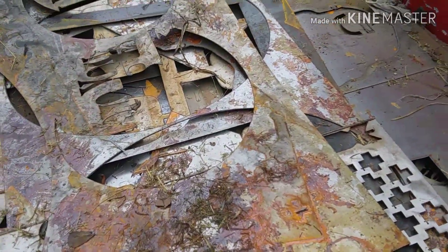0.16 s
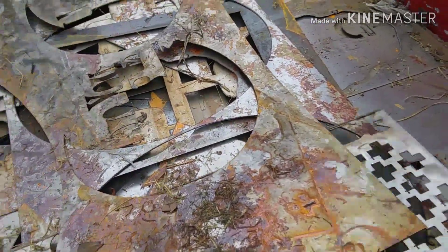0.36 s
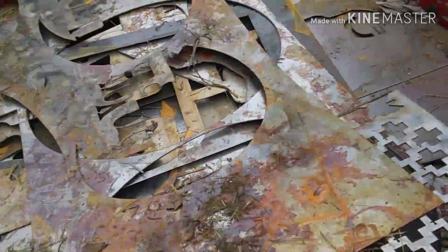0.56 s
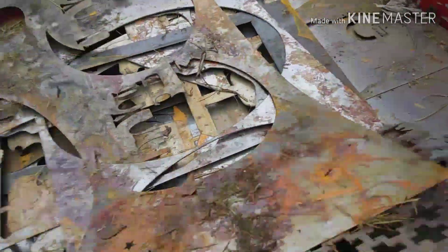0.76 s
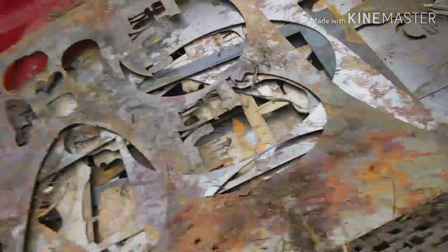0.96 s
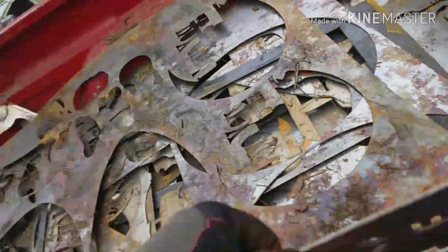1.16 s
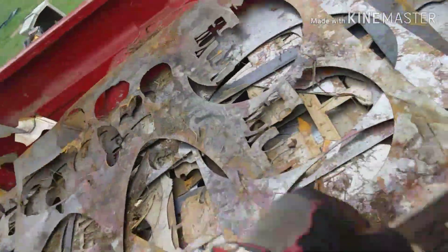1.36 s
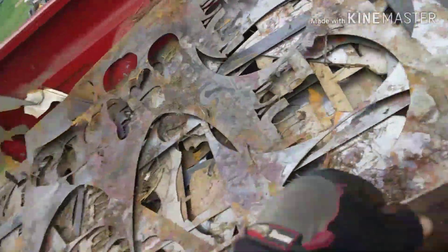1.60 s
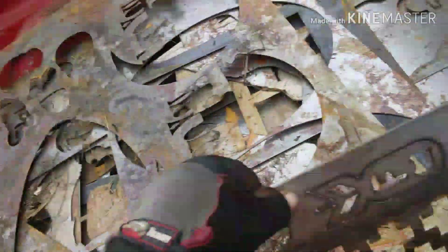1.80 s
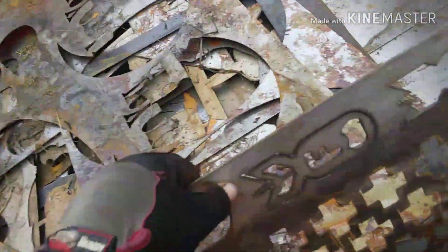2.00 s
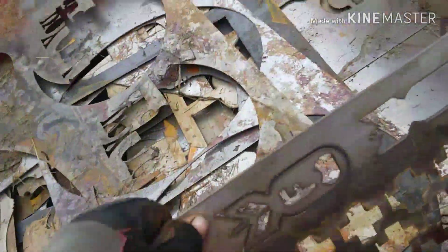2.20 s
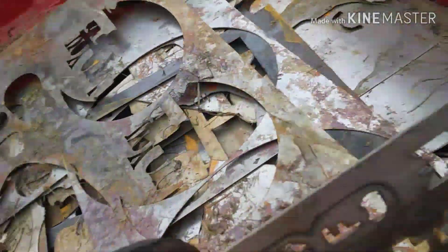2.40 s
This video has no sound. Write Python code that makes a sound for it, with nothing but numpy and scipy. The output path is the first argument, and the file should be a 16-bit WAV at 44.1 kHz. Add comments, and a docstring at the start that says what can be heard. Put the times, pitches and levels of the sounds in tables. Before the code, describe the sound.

Thin steel sheets on a truck bed: near silence, a sudden burst of clanking knocks, thuds and brief yelps, then a long gritty scrape that brightens and fades to a few light ticks; outdoors, close, overloaded microphone.

```python
"""On a truck bed outdoors, thin rusty steel sheets are dragged off a pile, close to one microphone.
Grit under the sliding sheet and knocks of cut edges are random clicks and noise bursts that ring
the dense modes of the sheets. The bed thuds as decaying tones and rumbles as long ringing noise,
a bending sheet yelps in short broken gliding rings, a skating edge hisses as a band of noise,
and a faint outdoor rumble lies below. The loud middle overloads the recorder."""
import sys
import numpy as np
from scipy import signal
from scipy.fft import rfft, irfft
from scipy.io import wavfile
from scipy.ndimage import uniform_filter1d

SR = 44100
rng = np.random.default_rng(int(sys.argv[2]) if len(sys.argv) > 2 else 0)


def gain_from_decibels(decibels):
    """Convert decibel values to linear amplitude factors."""
    exponent = np.asarray(decibels, float) / 20
    return 10 ** exponent


def output_pcm(signal):
    """Save a mono or channel-first signal as 16-bit PCM at the path in sys.argv[1].

    Samples are clipped to [-1, 1] before scaling.
    """
    pcm = np.clip(np.atleast_2d(signal).T, -1, 1) * 32767
    wavfile.write(sys.argv[1], SR, np.round(pcm).astype(np.int16))


N = 108045  # length of the scene in samples

# All levels in the tables are those before record().
# How hard grit drives the body of the sheets during the drag: time_s, level_db
DRAG = [(0.03, -72), (0.06, -42.5), (0.09, -44), (0.18, -54), (0.2, -46), (0.26, -14), (0.34, -22),
        (0.35, -17), (0.5, -26.5), (0.55, -23.5), (0.57, -21.5), (0.6, -17.5), (0.74, -15), (0.97, -18),
        (1.31, -15), (1.7, -15.5), (1.92, -21), (1.94, -21), (2.18, -37), (2.19, -39), (2.27, -44.5),
        (2.33, -40.5), (2.34, -34.5), (2.45, -45.5)]
# How hard the rasp of edge on edge drives the treble: time_s, level_db
RASP = [(.24, -46), (.42, -45), (.47, -55), (.61, -37.5), (0.73, -35), (0.836, -34), (0.956, -29),
        (0.968, -24.5), (1.016, -26.5), (1.032, -24.5), (1.084, -31), (1.112, -25.5), (1.12, -26),
        (1.258, -31), (1.294, -23), (1.358, -32.5), (1.37, -23), (1.47, -26.5), (1.478, -24.5),
        (1.554, -30.5), (1.908, -44), (1.92, -40.5), (2.012, -58), (2.036, -51), (2.16, -71)]
# Edges knocking: start_s, treble_level_db, body_level_db (before KNOCK_BODY_DB), decay_to_1/e_s
KNOCKS = [(0.028, -82, -47, 0.021), (0.052, -69, -35.5, .025), (0.092, -52.5, -34, 0.0043),
          (0.193, -62, -21, 0.016), (0.231, -56, -12, .016), (0.254, -36.5, -14.5, 0.019),
          (.339, -40, -8, 0.017), (.406, -32, -7.5, .011), (0.474, -33, -11, 0.0069),
          (0.517, -30, -7.5, 0.0079), (0.564, -28, -4, 0.011), (.593, -22, -9, .014),
          (.683, -19, -14.5, 0.015), (1.363, -20, -25, .008), (2.177, -48, -21.5, 0.013),
          (2.306, -62, -30, 0.016), (2.334, -50, -26, 0.0069), (2.347, -36, -24, 0.0052)]
KNOCK_BODY_DB = -9  # added to the body level of every knock
# Tone colour of the sheets' body, only relative: frequency_hz, level_db_per_hz
BODY_COLOUR = [(29, -95), (50, -60), (101, -27), (151, -41), (201, -19), (299, -14), (444, -12), (794, -3),
               (1340, 0.5), (1940, 0.5), (2800, -4.5), (3780, -9), (5000, -13), (6000, -20), (7000, -33),
               (9360, -47.5), (15800, -100)]
# Tone colour of the sheets' edges, only relative: frequency_hz, level_db_per_hz
EDGE_COLOUR = [(1470, -44.5), (2500, 5.5), (2890, -5.5), (4540, -1.5), (5210, -2), (7470, -14),
               (8780, -9.5), (10200, -10), (12700, -16.5), (15600, -19.5)]
# How long the sheets ring: frequency_hz, time_to_fall_60_db_s
RING = [(200, 0.65), (1000, 0.28), (3000, 0.098), (7000, 0.1), (15000, 0.017)]
# A bending sheet yelps: start_s, length_s (before the fade), level_db, first_pitch_hz, last_pitch_hz
YELPS = [(0.203, 0.014, -34, 790, 760), (0.225, 0.032, -21, 1347, 1470), (0.256, 0.015, -16, 1616, 1754),
         (0.26, 0.016, -20, 996, 1025), (.28, .035, -18.5, 1760, 1865), (.345, 0.012, -18, 1480, 1530),
         (0.565, 0.0055, -12.5, 1672, 1630), (0.567, 0.0111, -16, 778, 743),
         (.582, 0.0093, -15.5, 840, 833)]
# Thuds of the truck bed: start_s, level_db (before rise and decay), pitch_hz, time_to_fall_60_db_s
THUDS = [(0.194, -42.5, 430, 0.07), (0.24, -30, 304, 0.077), (0.274, -14.5, 353, 0.064),
         (0.291, -24, 344, 0.082), (0.312, -16.5, 347, 0.075), (0.34, -18, 296, 0.054),
         (0.473, -14, 320, 0.052), (0.533, -14, 252, 0.064), (0.569, -19.5, 293, 0.081)]
# A bright hiss as an edge skates: start_s, length_s (before the fade), level_db, centre_hz, half_width_hz
HISS = (.958, 0.0739, -27.5, 10000, 1500)
# Tone colour of the bed's rumble, only relative: frequency_hz, level_db_per_hz
BED_COLOUR = [(29, -96), (50, -63), (296, -8.5), (676, -19), (736, -2), (873, -9), (1500, -10.5),
              (1950, -47), (3300, -120)]
# Tone colour of the outdoor rumble, only relative: frequency_hz, level_db_per_hz
YARD_COLOUR = [(35, -44), (60, -1), (124, 5), (312, 6), (486, -21), (623, -50), (800, -40), (1040, -49),
               (1760, -120)]

GRIT_PER_S = 3000  # average clicks per second
GRIT_SPREAD_DB, CLUMP_DB = 3.5, 1.24  # unevenness of click size; rms swing of the clumps
SPOT_COLOUR_DB = 1.6  # rms height of each spot's own humps
SPOT_STAY_S = 0.02  # the group of contact spots moves on by one spot in this time
YELP_WIDTH_HZ, YELP_ROUGH = 300, 0.53  # smoothing of the wobble noise; its rms against the pure tone
THUD_RISE_S = 0.0024
BED_DB, BED_T60_S = -27.5, 2  # level of the rumble against its force; time to fall 60 dB
YARD_DB = -64.5  # rms level
LOW_CUT_HZ, LOW_LEAK_DB, SOFT_TOP_HZ = 171, -12.5, 10200
CLIP, KNEE = 0.51, 24.0  # overload ceiling (amplitude); a higher knee bends more sharply


def evened(x):
    """Scales a signal to rms 1."""
    return x / np.sqrt(np.mean(x ** 2) + 1e-20)


def read(points, hz):
    """Reads a value from a table on a log-frequency axis."""
    table_hz, value = np.transpose(points)
    return np.interp(np.log(hz + 1), np.log(table_hz + 1), value)


def add(mix, start, sound):
    """Mixes a sound in at a time in seconds."""
    part = mix[round(start * SR):][:len(sound)]
    part += sound[:len(part)]


def pile(count=28, neighbours=7):
    """Each click rings one of a few nearby spots; the contact moves on, so the colour keeps shifting."""
    body_force, edge_force = drives()
    position = np.arange(N) / SR / SPOT_STAY_S + rng.uniform(0, neighbours, N)
    here = position.astype(int) % count
    touched = here == np.arange(count)[:, None]
    rings = spots(count)
    body = signal.fftconvolve(body_force * touched, rings, axes=1).sum(0)
    edge = signal.fftconvolve(edge_force * touched, rings, axes=1).sum(0)
    body = signal.fftconvolve(body, colour_filter(BODY_COLOUR, 500, 3000))
    edge = signal.fftconvolve(edge, colour_filter(EDGE_COLOUR, 7000, 15000))
    return (body + edge)[:N] + bed(body_force)


def drives():
    """The forces on body and edges: grit under drag and rasp plus a short chatter for each knock."""
    t = np.arange(N) / SR
    body = grit() * gain_from_decibels(np.interp(t, *np.transpose(DRAG), left=-120, right=-120))
    edge = grit() * gain_from_decibels(np.interp(t, *np.transpose(RASP), left=-120, right=-120))
    chatter_t = np.arange(3000) / SR
    for start, treble_db, body_db, decay in KNOCKS:
        shape = np.exp(-chatter_t / max(decay, 0.001))
        edge_noise, body_noise = rng.standard_normal((2, 3000))
        add(edge, start, gain_from_decibels(treble_db) * shape * edge_noise)
        add(body, start, gain_from_decibels(body_db + KNOCK_BODY_DB) * shape * body_noise)
    return body, edge


def grit():
    """Grit catches and slips: sparse clicks of uneven size that come in clumps."""
    size = gain_from_decibels(GRIT_SPREAD_DB * np.minimum(rng.exponential(1, N), 5))
    sign = rng.choice([-1.0, 1.0], N)
    happens = rng.random(N) < GRIT_PER_S / SR
    # slow noise makes neighbouring clicks louder or softer together
    clumps = evened(uniform_filter1d(uniform_filter1d(rng.standard_normal(N), 700), 300))
    return evened(size * sign * happens * gain_from_decibels(CLUMP_DB * clumps))


def spots(count):
    """Rings of the sheets from many spots: dense modes as noise dying by band, each with its own humps."""
    noise = rng.standard_normal((count, SR // 4))
    hz, t, bands = signal.stft(noise, SR, nperseg=256)
    t60 = np.maximum(read(RING, hz), 0.01)[:, None]
    humps = evened(uniform_filter1d(rng.standard_normal((count, len(hz), 1)), size=2, axis=1))
    # dividing by the root of t60 gives long and short rings like energy
    shaped = bands * gain_from_decibels(SPOT_COLOUR_DB * humps - 60 * t / t60) / np.sqrt(t60)
    rings = signal.istft(shaped, SR, nperseg=256)[1]
    return rings / np.linalg.norm(rings, axis=1, keepdims=True)


def colour_filter(points, low_hz, high_hz):
    """A filter with the given colour that answers only after its input, scaled by its mean energy in a band."""
    hz = abs(np.fft.fftfreq(8192, 1 / SR))
    gain = gain_from_decibels(np.maximum(read(points, hz), -100))
    in_band = (hz > low_hz) * (hz < high_hz)
    gain /= np.sqrt(np.mean(gain ** 2 * in_band))
    # the phase is worked out from the log gain (minimum phase)
    spectrum = np.exp(np.conj(signal.hilbert(np.log(gain))))
    return np.fft.ifft(spectrum).real[:4096]


def yelp(start, length, db, first_hz, last_hz):
    """A narrow noisy ring that glides while the sheet bends."""
    t = np.arange(0, length + 0.013, 1 / SR)
    pitch = first_hz + (last_hz - first_hz) * np.minimum(t / length, 1)
    phase = 2 * np.pi * np.cumsum(pitch) / SR
    # slow noise wobbles both strength and phase
    pole = np.exp(-np.pi * YELP_WIDTH_HZ / SR)
    noise = rng.standard_normal((2, 8000))
    a, b = signal.lfilter([1], [1, -2 * pole, pole * pole], noise)[:, -len(t):]
    wobble = 1 + YELP_ROUGH * (evened(a) + 1j * evened(b))
    rise = np.minimum(t / (0.17 * length), 1)
    fade = np.exp(-np.maximum(t - length, 0) / 0.012)
    return start, gain_from_decibels(db) * rise * fade * (wobble * np.exp(1j * phase)).real


def thud(start, db, hz, t60):
    """A low panel mode of the bed: a sine that rises quickly and dies away."""
    t = np.arange(0, 0.25, 1 / SR)
    rise = (1 - np.exp(-t / THUD_RISE_S)) ** 2
    return start, gain_from_decibels(db - 60 * t / t60) * rise * np.sin(2 * np.pi * hz * t)


def hiss(start, length, db, hz, half_hz):
    """A skating edge: a band of noise that opens fast, holds and dies."""
    t = np.arange(0, length + 0.05, 1 / SR)
    band_pass = signal.butter(2, [hz - half_hz, hz + half_hz], "band", fs=SR, output="sos")
    band = signal.sosfilt(band_pass, rng.standard_normal(len(t)))
    rise = np.minimum(t / 0.008, 1)
    fade = np.exp(-np.maximum(t - length, 0) / 0.0099)
    return start, gain_from_decibels(db) * evened(band) * rise * fade


def bed(force):
    """The truck bed takes up drag and knocks and rumbles on: one second of dying, coloured noise as its ring."""
    t = np.arange(SR) / SR
    dying = rng.standard_normal(SR) * gain_from_decibels(-60 * t / BED_T60_S)
    ring = signal.fftconvolve(dying, colour_filter(BED_COLOUR, 50, 1500))
    return gain_from_decibels(BED_DB) * signal.fftconvolve(force, ring / np.linalg.norm(ring))[:N]


def yard():
    """A faint low outdoor rumble: steady noise shaped by frequency."""
    hz = np.fft.rfftfreq(N, 1 / SR)
    spectrum = rfft(rng.standard_normal(N)) * gain_from_decibels(read(YARD_COLOUR, hz))
    return gain_from_decibels(YARD_DB) * evened(irfft(spectrum, N))


def scene():
    """Everything at one microphone, the same on both channels."""
    mix = pile() + yard()
    for row in YELPS:
        add(mix, *yelp(*row))
    for row in THUDS:
        add(mix, *thud(*row))
    add(mix, *hiss(*HISS))
    return np.array([mix, mix])


def roll_off(x):
    """The treble ends steeply here."""
    return signal.sosfilt(signal.butter(12, 15740, fs=SR, output="sos"), x)


def record(dry):
    """The recorder: a leaky low cut, overload with a tight knee and a softened top."""
    low_cut = signal.butter(4, LOW_CUT_HZ, "high", fs=SR, output="sos")
    cut = signal.sosfilt(low_cut, dry) + gain_from_decibels(LOW_LEAK_DB) * dry
    bent = cut / (1 + abs(cut / CLIP) ** KNEE) ** (1 / KNEE)
    soft_top = signal.butter(2, SOFT_TOP_HZ, fs=SR, output="sos")
    finished = signal.sosfilt(soft_top, bent)
    return roll_off(finished)


dry = scene()
out = record(dry)
output_pcm(out)
```